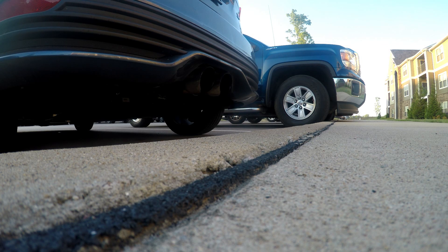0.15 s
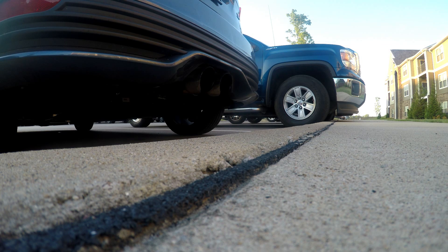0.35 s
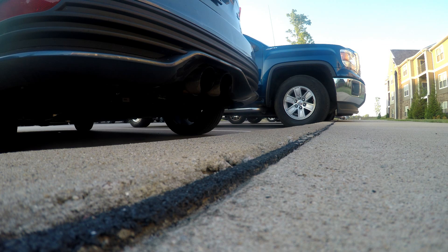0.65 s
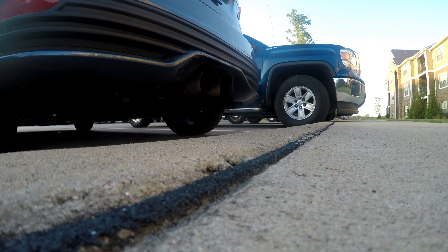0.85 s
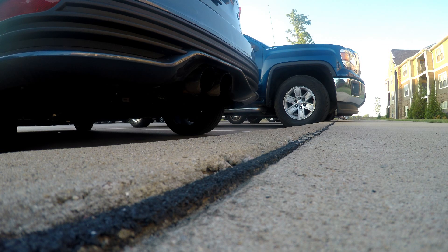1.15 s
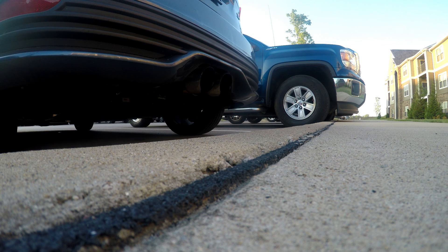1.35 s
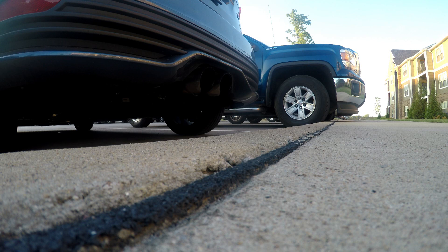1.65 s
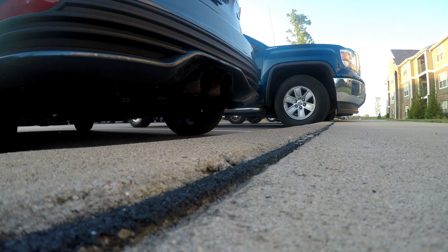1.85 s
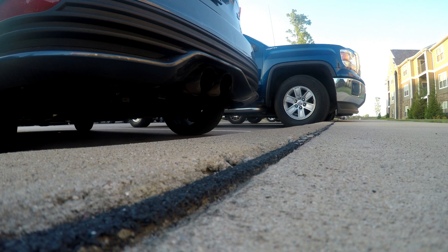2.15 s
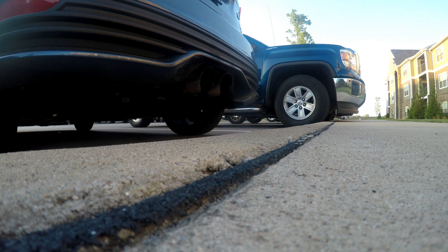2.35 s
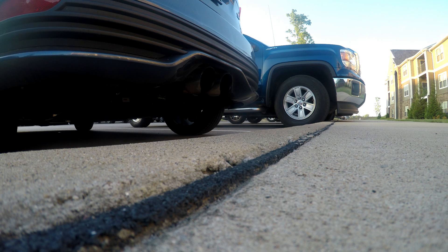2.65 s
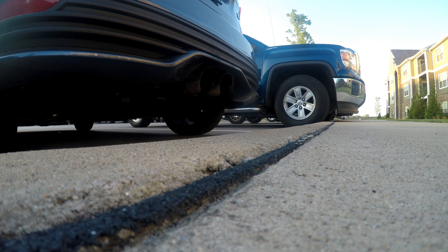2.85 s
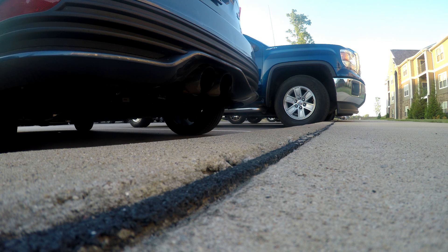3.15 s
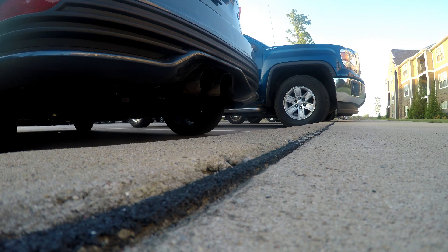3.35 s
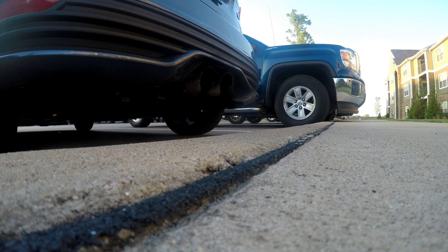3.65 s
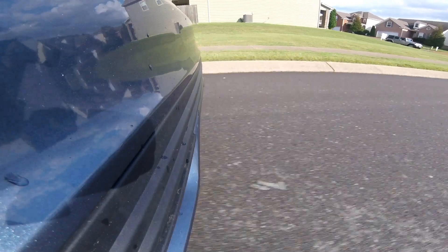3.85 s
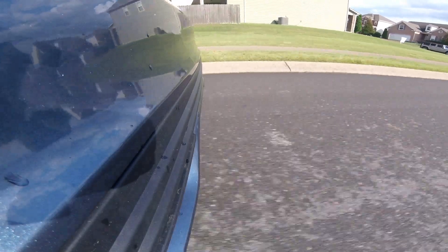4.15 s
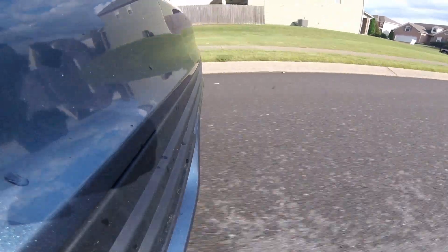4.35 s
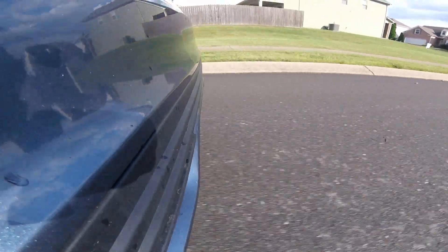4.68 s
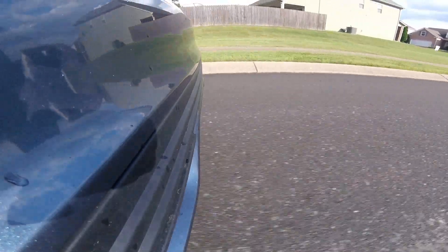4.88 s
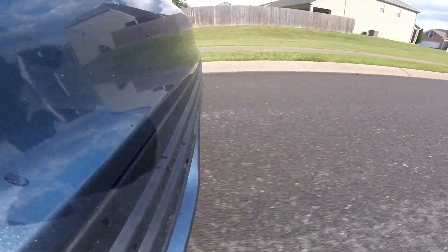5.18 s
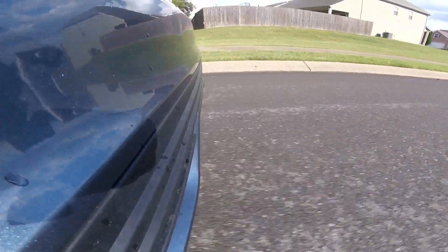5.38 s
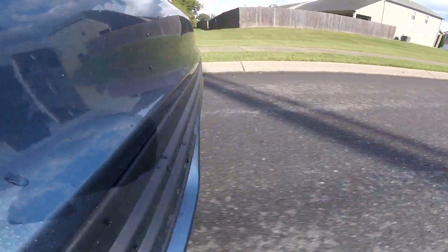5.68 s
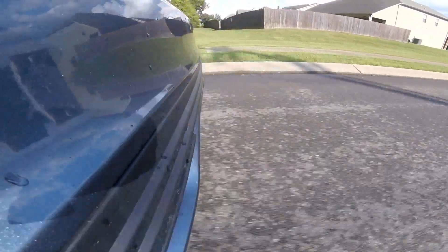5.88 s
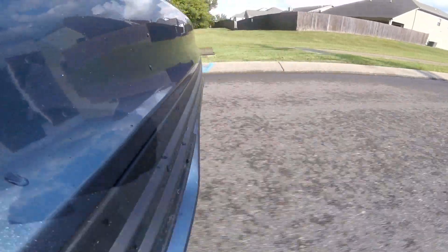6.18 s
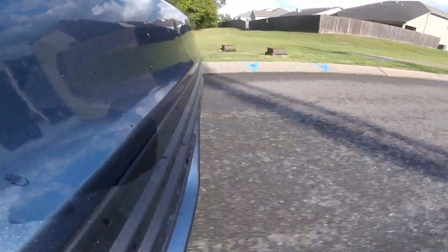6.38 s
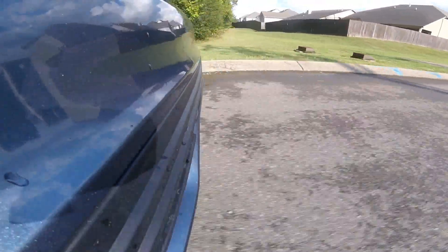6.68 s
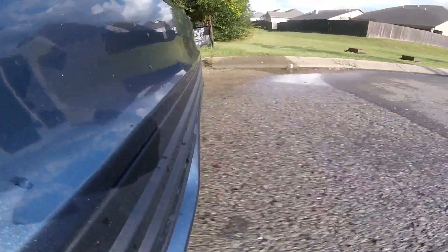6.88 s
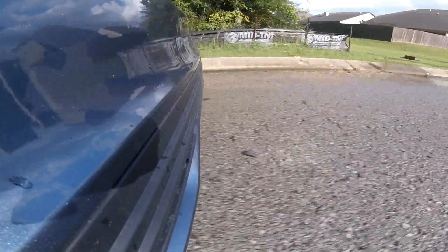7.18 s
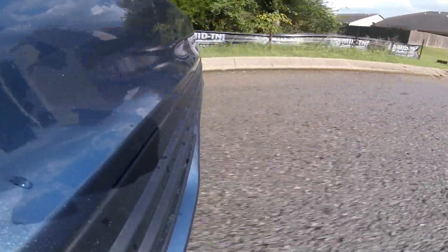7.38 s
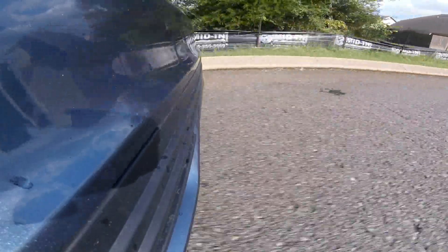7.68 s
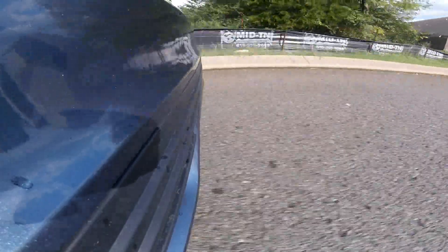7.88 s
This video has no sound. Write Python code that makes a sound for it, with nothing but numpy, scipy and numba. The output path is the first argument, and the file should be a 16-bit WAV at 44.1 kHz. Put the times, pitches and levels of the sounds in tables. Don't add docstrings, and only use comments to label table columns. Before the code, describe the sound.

Outdoors, close to the tailpipe, a low uneven idle dips, then jumps into a single rev with rushing gas and a thin whine. Revs fall slowly, burbling and thumping. The sound switches suddenly to a mono bumper-mounted view of the moving car: louder boomy exhaust, early pops, a steadier drone with road rumble and buzzing housing, a cluster of bangs over wet tarmac, then a rising raspy pull.

```python
import sys
import numpy as np
from scipy import signal
from scipy.fft import rfft, irfft
from scipy.io import wavfile
from scipy.ndimage import uniform_filter1d
from numba import njit

SR = 44100
rng = np.random.default_rng(int(sys.argv[2]) if len(sys.argv) > 2 else 0)


def undo_db(level):
    steps = np.asarray(level, float) / 20
    return 10 ** steps


def materialize(psi):
    bounded = np.clip(np.atleast_2d(psi).T, -1, 1)
    quanta = np.round(bounded * 32767).astype(np.int16)
    wavfile.write(sys.argv[1], SR, quanta)


N = 354123
TIME = np.arange(N) / SR
BINS = np.maximum(np.fft.rfftfreq(N, 1 / SR), 1)
CUT_S = 3.716
# (time [s], peak level [dB], pitch [Hz])
POPS = [(2.261, -5.5, 124.2), (2.501, -5, 110), (2.973, -10.5, 122), (3.997, -8, 247), (4.151, -12, 200),
        (4.194, -13.5, 170), (4.356, -13.5, 196), (5.258, -24, 110), (5.776, -9.5, 125), (5.968, -27, 128),
        (6.328, -16, 153), (6.889, -2, 140), (6.919, -8.5, 166.5), (6.987, -8, 151), (7.098, -35, 149),
        (7.338, -7, 213)]


def engine(table, orders, colour, uneven_db):
    # (start [s], deepest [s], end [s], depth [dB])
    lulls = [
        (1.14, 1.19, 1.25, -17),
        (1.91, 2.077, 2.08, -16),
        (3.4, 3.426, 3, -4),
        (3.7, 3.77, 3.84, -15.5),
        (4.47, 4.614, 4.66, -17.5),
        (4.968, 5.014, 5.35, -7.5),
        (5.89, 5.946, 6.55, -11.5),
        (5.982, 6.276, 6.46, -17.5),
        (6.88, 7.02, 7.16, -5.5),
    ]
    # (start [s], worst [s], end [s], rise [dB])
    burbles = [
        (-8, 0.4, 0.51, -5),
        (1.78, 1.92, 2.03, 14),
        (2.5, 1.8, 2.35, 7.5),
        (2, 2.52, 2.7, 8.5),
        (2, 2.97, 2.8, 7),
        (4.5, 4.16, 4.25, 7.5),
        (4, 5.25, 4.8, 5),
        (5, 6.55, 8.3, 7),
        (7.5, 6.93, 8, 7),
        (7.5, 7.45, 8.3, 6),
    ]
    hz, db, load = curves(table)
    pipe_hz, pipe_db = np.transpose(colour)
    levels = [db + bumps(lulls)] + [off + gain * load for off, gain in orders]
    levels = [d + np.interp(np.log(hz * (k + 1)), np.log(pipe_hz), pipe_db) for k, d in enumerate(levels)]
    return hz, load, *levels, db + uneven_db + bumps(burbles)


def exhaust(state, pipe, fall_db, overtone_db, half_db, lag):
    hz, _, db1, db2, db3, uneven_db = state
    turns = np.cumsum(hz * (1 + .008 * walk(14))) / SR
    uneven_db = np.minimum(uneven_db, -23)
    sizes = [undo_db(db1), undo_db(db2), undo_db(db3)]
    sizes += [undo_db(db3 - fall_db * k) + undo_db(db1 + overtone_db) for k in range(1, 6)]
    note = np.zeros(N)
    for k, size in enumerate(sizes):
        late = min(lag * k, np.pi)
        note += np.sqrt(2) * size * np.cos(2 * np.pi * (k + 1) * turns - late)
    halves = undo_db(half_db) * (np.sin(np.pi * turns) + np.sin(3 * np.pi * turns))
    luck = rng.standard_normal((N // 100, 2))
    depth = np.clip(1.6 * undo_db(uneven_db - np.maximum(db1, db2)), .06, .25)
    strength = 1 + depth * soften(luck[turns.astype(int), 0], 40)
    fired = np.flatnonzero(np.diff(np.floor(turns)))
    miss = np.zeros(N)
    miss[fired] = np.tanh(luck[:len(fired), 1]) / np.sqrt(hz[fired])
    uneven = undo_db(uneven_db) * (ring(miss, pipe) + halves)
    return strength * misfires(depth=0.48, width_s=0.011) * note + uneven, turns % 1


def misfires(depth, width_s):
    return np.prod([1 - depth * np.exp(-((TIME - s + width_s / 2) / width_s) ** 2) for s, *_ in POPS], axis=0)


def knocks(table, cycles, crack):
    out = np.zeros(N + SR)
    t = np.arange(SR // 10) / SR
    for s, peak_db, hz in table:
        burst = crack * rng.standard_normal(len(t)) * np.exp(-t * hz * 2)
        body = np.sin(2 * np.pi * hz * t) + burst
        start = int(s * SR)
        out[start:start + len(t)] += undo_db(peak_db) * body * np.exp(-t * hz / cycles)
    return out[:N]


def pops():
    return soften(knocks(POPS, cycles=1.2, crack=.7), 600)


def gas_rush(hz, push, phase, roar_db, revved):
    # (frequency [Hz], level per Hz [dB])
    idle_colour = [(150, -33), (250, -3.5), (400, -4.5), (555, 2), (640, -13.5), (950, -13), (1250, -17.5),
                   (1750, -14.5), (2700, -26), (3800, -20), (4900, -29), (6100, -24), (8000, -32),
                   (10500, -32.5), (13125, -57)]
    roar_colour = [(168, -31), (280, -1.5), (400, -2.5), (530, -2), (620, -18.5), (700, -10), (1000, -15),
                   (1320, -14.5), (1500, -11.5), (1750, -10.5), (2300, -16.5), (2800, -24), (3500, -60.5)]
    hiss_colour = [(1800, -36), (3000, 1.5), (3400, 0.5), (4100, 4), (5000, -3.5), (5700, -0.5),
                   (6500, -2.5), (7200, -7.5), (8500, -12), (10500, -17), (13000, -35.5), (16250, -47)]
    # (frequency [Hz], width [Hz], level [dB])
    tip_modes = [(664, 52, 6.5), (1289, 58, 8), (1715, 110, -3), (2270, 200, -14)]
    hiss_db = -54 + 0.1467 * (hz - 33) + 2 * push
    idle = np.sqrt(1 - revved) * undo_db(roar_db) * noise(idle_colour, (1000, 2500), 1.2, ports=True)
    roar = np.sqrt(revved) * undo_db(roar_db) * noise(roar_colour, (1000, 2500), 1.2, ports=True)
    hiss = np.sqrt(revved) * undo_db(hiss_db) * noise(hiss_colour, (3000, 9000), .8, ports=True)
    singing = np.clip((roar_db + 48) / 8, 0, 1)
    flare = undo_db(roar_db - 11) * singing * ring(rng.standard_normal(N), tip_modes)
    puff = 1 + 0.076 * np.cos(2 * np.pi * phase)
    return puff * (idle + roar + flare) + hiss


def silencer(phase):
    hz, width_hz = 510., 90.
    comb = sum(np.cos(2 * np.pi * k * phase + k * k) for k in (8, 10))
    return ring(svf(comb, hz, width_hz), [(hz, width_hz, -2)])


def belt_whine(hz, push):
    # (frequency [Hz], width [Hz], level [dB])
    shell = [(920, 100, -15)]
    belt = 2 * np.pi * 5.25 * np.cumsum(hz) / SR
    overtones = (1 - push) * ring(np.sin(2 * belt) + np.sin(5 / 2 * belt), shell)
    return undo_db(1.5) * (np.sin(belt) + overtones)


def two_ports(x):
    # (frequency [Hz], left minus right [dB])
    balance = [(40, -2.5), (80, -0.5), (150, 1.2), (300, 4.5), (550, 4.5), (1000, 3), (1700, 2), (3000, 4),
               (4000, -0.67), (9000, -0.5)]
    # (frequency [Hz], phase [radians])
    lead = [(40, 0.15), (100, 0.37), (300, 0.14), (600, 0.21), (1700, 0.98), (3000, .01), (4000, 0.52)]
    half = undo_db(over_hz(balance) / 2) * np.exp(.5j * over_hz(lead))
    return irfft(rfft(x) * np.array([half, 1 / half]), N)


def parked(hits):
    # (time [s], firing rate [Hz], first order level [dB], load [0-1])
    revs = [
        (0, 36.87, -19, 0.33),
        (1.18, 31.84, -31.5, 0.55),
        (1.29, 37.92, -17, 0.84),
        (1.5, 67.6, -13, 0.76),
        (1.7, 99.55, -12.5, 0.86),
        (1.8, 105.2, -15.5, 0.75),
        (1.92, 101.9, -21.5, 0.05),
        (2.3, 90.47, -16.5, .25),
        (3.0, 66.8, -15, 0.17),
        (3.716, 46.7, -17.5, 0),
    ]
    # (level off load [dB], gain at full load [dB])
    orders = [(-36.5, 22), (-49, 28.5)]
    # (frequency [Hz], level [dB])
    colour = [(70, 0.3), (103, 2.5), (135, 5.5), (170, -6), (205, -0.8), (300, -4)]
    # (frequency [Hz], width [Hz], level [dB])
    pipe = [(30.3, 13, 1), (52, 21, 10.5), (65, 39, 8), (127.6, 26, 10), (219, 240, -24), (322, 220, -20.5),
            (531, 62, -27.5)]
    # (frequency [Hz], width [Hz], level [dB])
    hum_modes = [(213, 9, -48), (281, 7, -52)]
    state = engine(revs, orders, colour, uneven_db=-23)
    note, phase = exhaust(state, pipe, fall_db=8.5, overtone_db=-41, half_db=1.0, lag=np.pi * 4 / 5)
    hz, push = state[0], np.clip((state[1] - .62) / 0.22, 0, 1)
    roar_db = -54 + 0.1883 * (hz - 33) + 4 * push
    revved = np.clip((roar_db + 54) / 7, 0, 1)
    gas = gas_rush(hz, push, phase, roar_db, revved)
    whine = revved * undo_db(roar_db) * (belt_whine(hz, push) + silencer(phase))
    hum = ring(rng.standard_normal(N), hum_modes)
    return two_ports(note + whine + hum + hits + gas)


def rasp_buzz(phase):
    # (frequency [Hz], width [Hz], level [dB])
    tips = [(908, 170, 3.5), (1797, 220, -8.5), (2890, 280, -19), (3786.3, 420, -26.5), (4890, 700, -36)]
    shake = np.exp(-((phase + .73) % 1) / .5) * rng.standard_normal(N)
    return ring(shake, tips)


def driving(hits):
    # (time [s], firing rate [Hz], first order level [dB], load [0-1])
    revs = [(3.716, 57, -12, 0.73), (3.93, 75.23, -7.5, 0.99), (4.0, 77.6, -13.5, 0.61),
            (4.07, 69.5, -12, 0.55), (4.36, 59.37, -14, 0.44), (4.62, 82.1, -12, 0.043),
            (4.8, 77.56, -10.5, 0.067), (5.0, 79.95, -11, 0.061), (5.22, 74.02, -10, 0.29),
            (5.9, 72.18, -10, 0.31), (6.3, 70.7, -16.5, 0.75), (6.8, 74.7, -10.5, 0.9),
            (7.3, 77.5, -10.5, 0.78), (7.7, 85.02, -11.5, 0.98), (8.03, 95.36, -13.5, 0.95)]
    # (level off load [dB], gain at full load [dB])
    orders = [(-41, 24.5), (-53.5, 26.6)]
    # (frequency [Hz], level [dB])
    colour = [(70, 0.1), (120, -4), (145, .1), (185, 3), (220, 0.1), (260, -0.5)]
    # (frequency [Hz], width [Hz], level [dB])
    pipe = [(28.3, 57, 7.5), (50.5, 24.4, 15), (110, 87, 6), (173.1, 110, -13.5), (308, 33, -16.5)]
    state = engine(revs, orders, colour, uneven_db=-31.5)
    note, phase = exhaust(state, pipe, fall_db=7.5, overtone_db=-49.5, half_db=8.0, lag=np.pi / 4)
    rasp_db = -50 + 26 * np.clip((state[0] - 76.3) / 17.4, 0, 1.1) ** 0.53
    loaded = np.clip((state[1] - .5) / .25, 0, 1)
    rasp = loaded * undo_db(rasp_db) * rasp_buzz(phase)
    return note + hits + rasp + road_noise(loaded, rasp_db) + housing_buzz(loaded, rasp_db)


def ticks():
    # (time [s], peak level [dB], pitch [Hz])
    taps = [
        (3.7145, -33, 3430),
        (3.8123, -37, 3920),
        (3.8437, -31, 3160),
        (3.876, -41, 3500),
        (7.236, -34.5, 3032),
        (7.4599, -36.5, 2977),
        (7.979, -33, 3040),
    ]
    return soften(knocks(taps, cycles=2.2, crack=2.0), 9500)


def hisses():
    # (time [s], level [dB], fade [s], frequency [Hz], width [Hz])
    sprays = [
        (1.72, -30, .02, 1350, 200),
        (1.73, -30, .015, 2000, 700),
        (1.805, -31, .03, 1360, 180),
        (3.89, -33, .06, 900, 140),
        (4.574, -50, .012, 4780, 250),
        (4.574, -50, .015, 6300, 400),
        (6.758, -31, .03, 1400, 900),
        (6.8, -39, .6, 1150, 500),
        (6.95, -41, .35, 1050, 500),
        (3.8, -43, .12, 600, 300),
    ]
    air = rng.standard_normal(N)
    out = np.zeros(N)
    for s, db, fade, hz, width in sprays:
        out += (TIME > s) * np.exp(-abs(TIME - s) / fade) * ring(air, [(hz, width, db)])
    return out


def road_noise(loaded, rasp_db):
    # (frequency [Hz], level per Hz [dB])
    colour = [(180, -24.5), (300, 0.0), (400, -14), (600, -15.5), (750, -19.5), (1000, -12.5),
              (1400, -17.5), (2000, -23), (2800, -31.5), (3800, -38), (4750, -65)]
    wet_db = 3 * np.clip((TIME - 6.78) / 0.059, 0, 1)
    road_db = -47 + 0.2 * (TIME - CUT_S) + wet_db
    return (undo_db(road_db) + loaded * undo_db(rasp_db - 20)) * noise(colour, (1100, 1600), 1.2)


def housing_buzz(loaded, rasp_db):
    # (frequency [Hz], level per Hz [dB])
    colour = [(2700, -29), (4500, 1), (5400, -3), (6000, 0), (6400, 8), (6800, -5), (7300, -6.5),
              (9000, -13.5), (11500, -31.5), (14375, -47.5)]
    housing_db = -64.5 + 0.43 * (TIME - CUT_S)
    return (undo_db(housing_db) + loaded * undo_db(rasp_db - 30)) * noise(colour, (5500, 7000), 2.5)


def noise(colour, band, flicker_db, ports=False):
    # (frequency [Hz], unrelated share [0-1])
    unlike_share = [(300, .2), (550, 0.41), (1000, 1), (1700, 0.86), (3000, 0.72), (4000, 0.21), (6000, 1),
                    (9000, 0.81)]
    hiss = rng.standard_normal((2, N)) * undo_db(flicker_db * walk(7.5))
    mid, side = rfft(hiss) * undo_db(over_hz(colour))
    inside = (BINS > band[0]) & (BINS < band[1])
    scale = N / np.sqrt(2 * np.sum(abs(mid[inside]) ** 2))
    if not ports:
        return irfft(mid * scale, N)
    unlike = np.clip(over_hz(unlike_share), 0, 1)
    return irfft(np.array([mid + unlike * side, mid - unlike * side]) * scale, N)


@njit
def svf(x, hz, width):
    y, b, l = np.empty(len(x)), 0., 0.
    g, k = np.tan(np.pi * hz / SR), width / hz
    for i in range(len(x)):
        v = (b + g * (x[i] - l)) / (1 + g * (g + k))
        b, l, y[i] = 2 * v - b, l + 2 * g * v, k * v
    return y


def ring(x, modes):
    out = np.zeros(N)
    for hz, width, db in modes:
        once = svf(x, 1. * hz, 1.01 * width)
        out += level(svf(once, 1. * hz, 1.01 * width), db)
    return out


def soften(x, hz):
    return signal.sosfilt(signal.butter(4, hz, fs=SR, output="sos"), x)


def level(x, db):
    return x * undo_db(db) / np.sqrt(np.mean(x ** 2))


def walk(rate):
    k = int(SR / rate)
    held = np.repeat(rng.standard_normal(N // k + 1), k)
    return uniform_filter1d(uniform_filter1d(held, k), k)[:N]


def bumps(table):
    return sum(np.interp(TIME, [a, b, c], [0, db, 0]) for a, b, c, db in table)


def curves(table):
    s, *columns = np.transpose(table)
    return [np.interp(TIME, s, c) for c in columns]


def over_hz(table):
    hz, value = np.transpose(table)
    return np.interp(np.log(BINS), np.log(hz), value)


def scene():
    hits = pops() + ticks() + hisses()
    second = np.clip((TIME - CUT_S) / .004, 0, 1)
    return (1 - second) * parked(hits) + second * driving(hits)


def band_limit(x):
    return signal.sosfilt(signal.butter(12, 15720, fs=SR, output="sos"), x)


def record(dry):
    thin = signal.sosfilt(signal.butter(2, 17, "high", fs=SR, output="sos"), dry)
    return band_limit(np.tanh(.8 * thin) / .8)


dry = scene()
out = record(dry)
materialize(out)
```